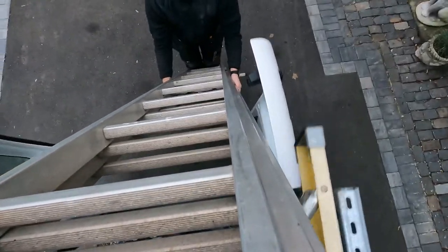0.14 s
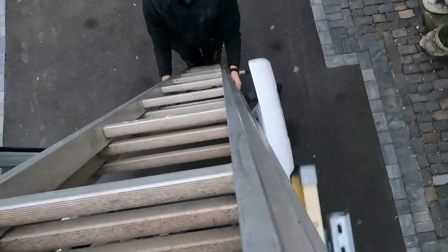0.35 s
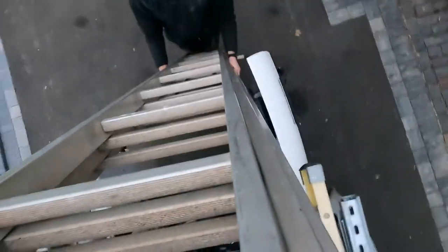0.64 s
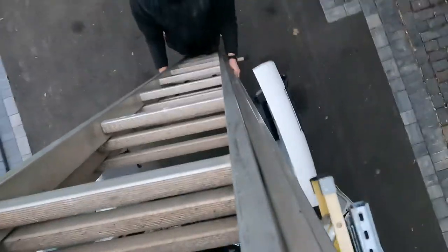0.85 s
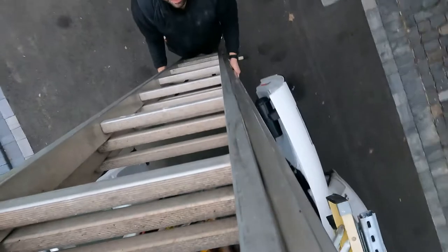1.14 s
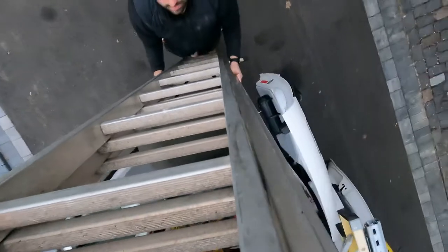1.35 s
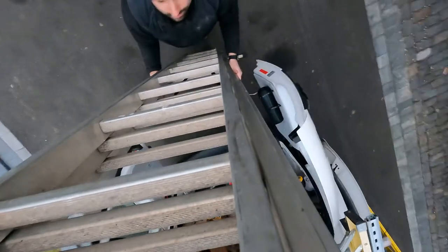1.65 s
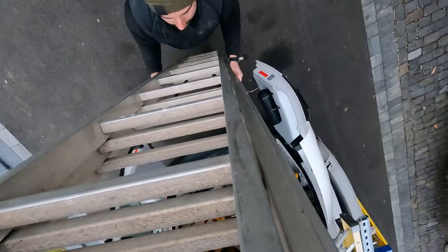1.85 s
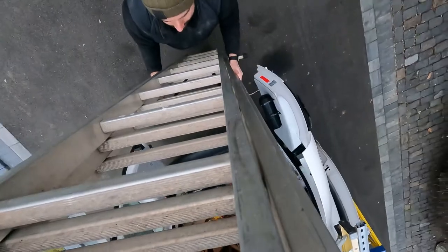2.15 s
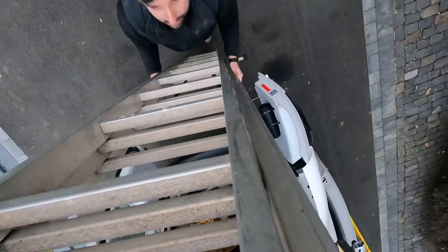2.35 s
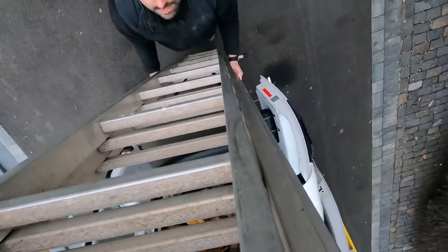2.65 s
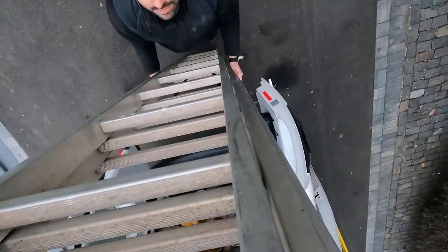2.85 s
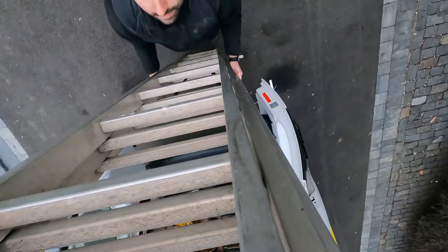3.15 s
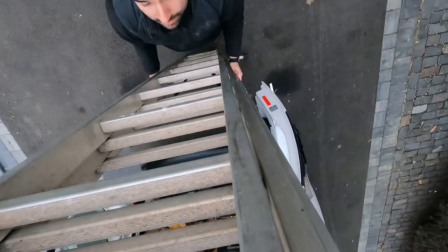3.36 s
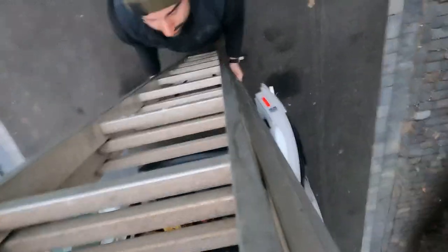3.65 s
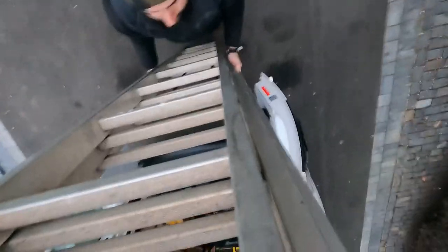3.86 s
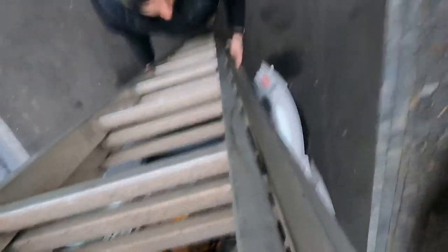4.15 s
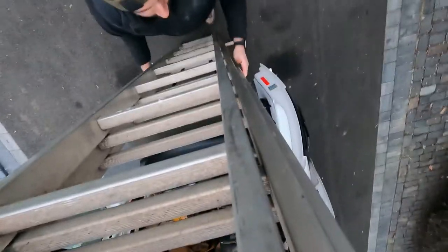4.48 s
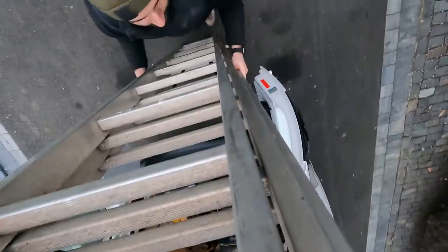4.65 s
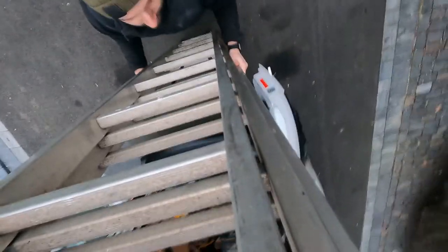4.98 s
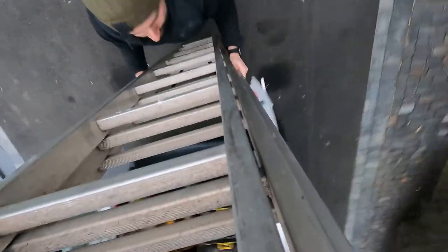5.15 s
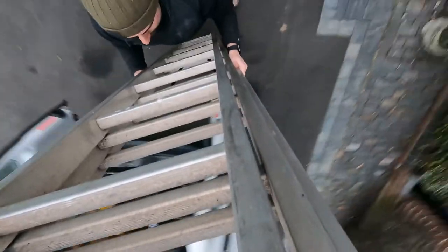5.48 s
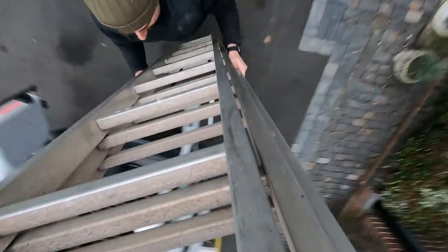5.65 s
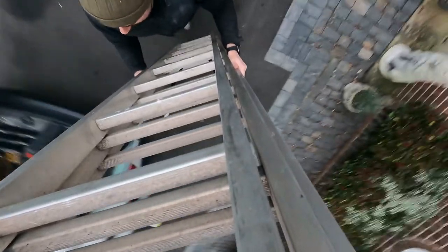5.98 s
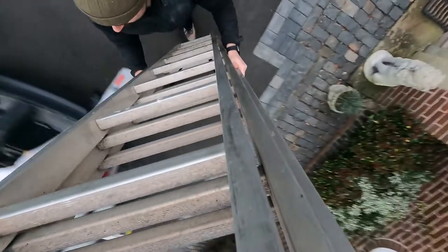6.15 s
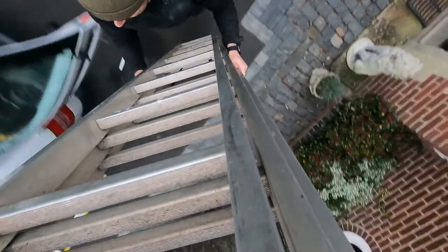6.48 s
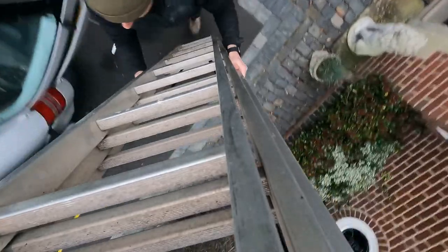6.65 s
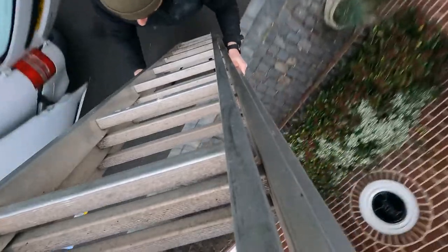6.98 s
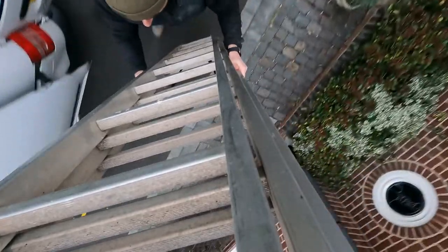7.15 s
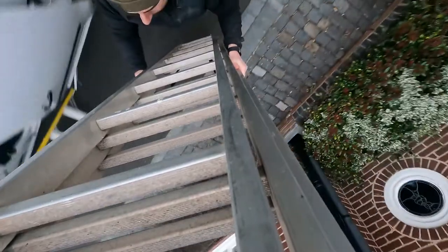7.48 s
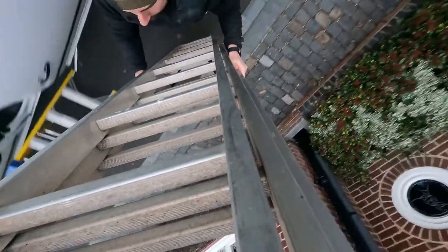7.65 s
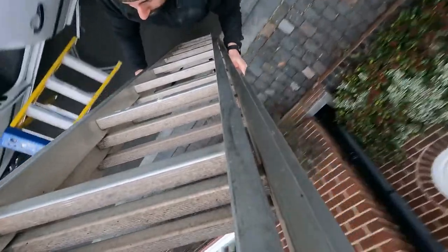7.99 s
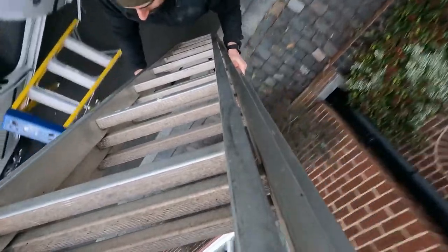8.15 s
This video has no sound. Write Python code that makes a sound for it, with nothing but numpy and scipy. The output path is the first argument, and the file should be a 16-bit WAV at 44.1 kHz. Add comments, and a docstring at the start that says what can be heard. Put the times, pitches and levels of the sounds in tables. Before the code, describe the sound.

Steady, muted traffic rumble lies behind an aluminium ladder being handled. One violent bang rings through its hollow rails, followed by small knocks and a brief faint bird whistle. After a lull, crowded blows and scraping shake the metal again, then soften to occasional taps and rubbing. Quick, gliding birdsong with slight outdoor echo closes the scene. Very close, nearly mono pickup with low mount thuds.

```python
"""An aluminium ladder is lifted and carried outdoors, heard by a small camera fixed to its top.
Over steady far street noise, soft rubbing leads to hard knocks after half a second, then it grows calmer.
A songbird whistles briefly near 1.7 s; from 3.6 to 5.1 s knocks and scrapes crowd together, then soften.
A thin far bird is heard from 5.7 s, and the songbird sings from 6.6 s almost to the end.
Blows and rubbing ring modes of the metal, jolts and bending are dying low swings, birds are gliding sines."""
import sys
import numpy as np
from scipy import signal
from scipy.fft import rfft, irfft
from scipy.io import wavfile
from scipy.ndimage import uniform_filter1d

SR = 44100
rng = np.random.default_rng(int(sys.argv[2]) if len(sys.argv) > 2 else 0)


def int16_out(signal):
    """Quantize to a 16-bit WAV file."""
    q = np.round(np.clip(np.atleast_2d(signal).T, -1, 1) * 32767)
    wavfile.write(sys.argv[1], SR, q.astype(np.int16))


def volts_from_db(level):
    """Convert decibel levels to linear amplitude ratios."""
    exponent = np.asarray(level, float) / 20
    return 10 ** exponent


N = 366912  # length in samples

# In all tables t60 is the time in seconds in which a sound dies away by 60 dB.
# Far traffic and air. Each row: frequency in Hz, level in dB per Hz.
STREET = [(15, -45), (25, -22), (70, 6), (173, -3.5), (271, -1), (569, -6), (846, -6), (940, -9.5),
          (1440, -10), (2140, -14.5), (3930, -30.5), (7030, -41.5), (9170, -68.5), (11900, -52),
          (14000, -74)]
# Rubbing, hand shifts and steps. Each row: middle in seconds, length in seconds, level in dB,
# brightness in dB (top against bass).
STROKES = [(.0, .2, -39, -42.5), (0.1, 0.65, -43, -16), (0.46, 0.76, -48.5, -17), (0.845, 0.11, -28, -31),
           (1.22, 0.25, -44.5, -20.5), (1.3, 0.36, -47, 0.5), (1.49, 0.32, -49, 0.5),
           (1.598, 0.15, -25, -52), (1.776, 0.24, -26, -44), (2.284, .3, -48, -29),
           (2.716, 0.31, -42, -33.5), (3.816, 0.18, -16, -31.5), (4.011, 0.16, -13, -25.5),
           (4.4, .4, -53.5, -10.5), (4.704, 0.77, -53, -14), (5.016, .2, -30, -27), (5.624, 0.76, -42, -46),
           (5.89, 0.66, -55.5, -14), (6.377, 0.5, -37, -38), (6.536, 0.9, -70, -2),
           (6.921, 0.23, -35, -37.5), (7.295, 0.64, -52.5, -16.5), (7.483, 0.33, -42.5, -27),
           (7.884, 0.96, -52, -15), (8.0, 0.78, -46.5, -32), (8.313, 0.5, -58.5, -8)]
# How far a stroke has faded at either end. One value in dB for each band, low to high.
STROKE_FADE_DB = [-14, -13, -13, -19.5]
# Balance of a stroke. One value in dB for each band, low to high.
STROKE_DB = [-0.44, -2.5, 1.5, -2.2]
# How much brightness lifts a stroke. One value in dB per dB for each band, low to high.
STROKE_PER_BRIGHT = [0.01, .35, .68, .99]
# Rattle left by a blow, against the blow. One value in dB for each band, low to high.
SHAKE_DB = [-13.5, -15, -16.5, -37.5]
# How long that rattle lasts. One t60 in seconds for each band, low to high.
SHAKE_T60 = [0.56, 0.26, 0.34, 0.82]
# Blows on the ladder. Each row: start in seconds, strength in dB, hardness in dB (treble against middle),
# t60 of the damping in seconds.
BLOWS = [(.083, -43.5, 5.5, 0.24), (0.123, -44.5, 10, 0.15), (0.461, -23, 15, .1), (.471, 2, -3, 0.1),
         (.494, -4.5, -5.5, 0.23), (0.524, -3, -5.5, 0.085), (.554, -8.5, -11.5, 0.45),
         (.619, -16.5, -28.5, 0.69), (0.705, -21, -11.5, 0.56), (0.827, -30.5, -8.5, 0.48),
         (0.897, -36, -5.5, 0.18), (.99, -77.5, 3.5, 0.3), (1.081, -40, 4, 0.51), (1.164, -48.5, 12, 0.53),
         (1.376, -34, -13.5, .25), (1.515, -30.5, -15, 0.32), (1.544, -28, -21, 0.17),
         (1.624, -19, -15.5, 0.43), (1.725, -20, -10.5, 0.24), (1.815, -17.5, -19.5, 0.37),
         (2.689, -40.5, -37.5, 0.74), (3.637, -13.5, -19, .66), (3.671, -3, -3, 0.087),
         (3.687, -14, -4.5, 0.5), (3.729, -22, -39, 0.19), (3.759, -14, -9, 0.44), (3.786, -17.5, -1, 0.44),
         (3.814, -12, -7, 0.15), (3.858, -14.5, -6.5, .12), (3.935, -16, -2.5, 0.22), (3.946, -8, 1.5, .41),
         (3.977, -16, 9, 0.32), (4.025, -20.5, 21.5, 0.073), (4.055, -22.5, 17.5, 0.17),
         (4.064, -20.5, 16, .2), (4.085, -10.5, -5.5, 0.22), (4.11, -2, -8.5, 0.061),
         (4.167, -12.5, 2.5, 0.18), (4.216, -15.5, -2.5, .27), (4.299, -19.5, -3, 0.35),
         (4.33, -17.5, -4, 0.083), (4.403, -21, -9, 0.071), (4.491, -39, -1, 0.34), (4.569, -19, -7, 0.067),
         (4.6, -28, 3, 0.2), (4.613, -21.5, -3, 0.22), (4.683, -25.5, -8, 0.063), (4.778, -28, -17, 0.45),
         (4.899, -25, -20, 0.32), (4.927, -31.5, -9, 0.25), (4.987, -25, -21.5, 0.077),
         (5.008, -15.5, -13, 0.18), (5.089, -5.5, -3, 0.41), (5.534, -25, -34, 0.047),
         (5.594, -18.5, -10.5, 0.086), (5.953, -26, -22, 0.19), (6.028, -28, -10.5, 0.16),
         (6.206, -26, -10.5, .25), (6.247, -28, -10.5, 0.41), (6.269, -26, -18, 0.24),
         (6.353, -28.5, -20.5, 0.2), (6.393, -32.5, -5, 0.2), (6.418, -29, -11.5, 0.32),
         (6.499, -60, 16.5, .15), (6.771, -42.5, -1, 0.38), (6.886, -29, -20, 0.12),
         (6.908, -28, -20, 0.29), (7.263, -62.5, 8, 0.13), (7.419, -38.5, -22, 0.28),
         (7.475, -41.5, -7, 0.092), (7.822, -51.5, 13, 0.55), (7.946, -29, -19, 0.46),
         (7.99, -32.5, -9, .19)]
# How bright the top treble of the blows is over time, with one very bright tick at 0.99 s.
# Each row: time in seconds, change of the highest band in dB.
BLOW_TREBLE = [(0, -21), (.5, 2), (.7, 0.5), (.95, -2), (.99, 45), (1.06, 2), (1.6, -5), (1.85, -7.5),
               (3.63, 6.5), (3.7, -15.5), (4.04, 1.5), (4.2, -14), (4.45, 1), (4.6, -14.5), (4.93, -17),
               (4.99, 3), (5.1, -6), (5.6, -4.5), (6.3, -5), (6.9, 4), (7.3, 5), (7.5, 4), (7.85, -10),
               (8, -5)]
# Centres of the four bands. One value in Hz for each band, low to high.
BANDS_HZ = [300, 1100, 3200, 7000]
# Clearest modes (natural tones) of rails and rungs. Each row: pitch in Hz, level in dB, t60 in seconds.
RUNGS = [(373, -7.5, 0.18), (518.3, 0, 0.19), (564.4, -2, 1), (661, 4.5, 0.2), (697.3, -0.5, 0.44),
         (784, -10, 1), (842, -5, 0.5), (985.5, -6, 0.24), (1076, -5, 0.52), (1112, -11, 0.59),
         (1240, -24.5, 0.31), (1517, -3, 0.4), (1600, -9.5, 0.3), (1761, -4.5, 0.41), (2010, -17.5, 0.16),
         (1950, -12, 0.22), (2226, -8, 0.44), (2450, -4, 0.21), (2717, -3, 0.3), (2834, -4, 0.2),
         (2973, -5, 0.12), (3300, -13, 0.28), (3560, -31, 0.083), (4040, -15, 0.42), (4300, -17, 0.3),
         (4506, -24.5, 0.35), (5120, -23, .15), (5020, -26, 0.54)]
# Dense weak modes of the thin walls. Each row: pitch in Hz, level in dB, typical t60 in seconds.
SHELL = [(54, -4.5, 0.088), (96, -1, 0.74), (350, 12, 0.43), (833, -2, 0.18), (1950, -4.5, 0.47),
         (4000, -11, 0.1), (7000, -17.5, 0.28), (8700, -31, 0.1), (8830, -33.5, 0.059), (9800, -34, 0.2),
         (11300, -26, 0.29), (14500, -60, .06)]
# Jolts of the camera mount. Each row: time in seconds, peak in dB, pitch in Hz, t60 in seconds.
THUMPS = [(0.187, -24.5, 266, 0.085), (0.272, -26.5, 280, 0.029), (.414, -28, 257, 0.044),
          (0.465, -4.5, 350, 0.039), (0.517, 3.5, 380, 0.036), (0.711, -18, 415, 0.1),
          (0.743, -20, 430, 0.084), (.832, -18, 429, 0.22), (1.192, -31, 388, 0.13),
          (1.498, -25.5, 393, 0.062), (1.584, -11, 318, 0.015), (1.625, -4.5, 370, 0.05),
          (1.721, -8.5, 350, .13), (1.77, -27, 366, .05), (1.814, -12.5, 365, 0.092),
          (2.688, -30, 384, 0.061), (3.635, -12, 243, 0.036), (3.668, -2.5, 336, .035),
          (3.69, -3, 333, 0.097), (3.759, -14, 304, 0.086), (3.853, -7.5, 365, .062),
          (3.956, -7.5, 344, 0.1), (3.979, -9.5, 350, .05), (4.003, -14, 350, 0.044),
          (4.028, -16, 352, .068), (4.072, -12, 350, .02), (4.092, -13, 318, 0.082),
          (4.166, -7.5, 337, 0.073), (4.308, -16, 356, 0.088), (4.341, -26, 338, 0.093),
          (4.4, -25.5, 327, .094), (4.656, -29.5, 331, 0.16), (4.811, -21, 340, 0.13),
          (4.898, -27, 330, 0.081), (4.988, -8, 373, 0.054), (5.007, -7, 350, 0.078),
          (5.094, -16, 342, 0.19), (5.458, -30, 334, 0.14), (5.592, -12, 356, 0.068),
          (5.95, -15, 357, 0.045), (6.028, -17.5, 356, 0.049), (6.204, -17.5, 350, 0.099),
          (6.255, -22.5, 334, 0.13), (6.349, -16, 342, 0.074), (6.415, -12.5, 362, 0.023),
          (6.886, -37.5, 350, 0.055), (6.906, -28.5, 271.5, 0.24), (7.419, -31.5, 342, 0.071),
          (7.945, -35, 223, .056), (8.057, -32, 275, .035)]
# Slow bending of the long rails. Each row: time in seconds, peak in dB, pitch in Hz.
SWAYS = [(.474, -12, 159), (0.489, -9, 237), (.55, -14, 217), (1.582, -37, 100), (1.83, -31, 139),
         (2.697, -41, 192), (3.633, -21, 154), (3.763, -22, 136), (3.943, -47, 170), (4.27, -34.5, 131),
         (4.608, -40, 180), (4.994, -57, 115.2), (5.864, -35, 162.6), (5.956, -28.5, 190),
         (6.204, -35.5, 170), (6.349, -39, 149), (6.416, -30.5, 150), (6.899, -50, 181), (7.419, -37, 191)]
# Songbird notes. Each row: start in seconds, length in seconds, first pitch in Hz, last pitch in Hz,
# level in dB.
NOTES = [(1.666, 0.042, 3510, 3150, -45), (1.681, 0.22, 3310, 3090, -52.5),
         (6.582, 0.028, 6370, 4800, -51.5), (6.611, 0.028, 4820, 4600, -39.5),
         (6.653, 0.12, 4410, 4700, -45.5), (6.723, 0.032, 4170, 3900, -29), (6.729, 0.041, 4675, 3350, -39),
         (6.751, 0.05, 5500, 5250, -45.5), (6.83, 0.025, 5100, 4300, -31.5),
         (6.912, 0.039, 5530, 3900, -33.5), (6.943, 0.028, 4000, 3900, -31.5),
         (7.012, 0.048, 5100, 4150, -33.5), (7.082, 0.18, 4530, 4320, -45.5),
         (7.323, 0.079, 4350, 4310, -55), (7.35, 0.079, 3793, 3200, -40.5), (7.403, .13, 3404, 3560, -35),
         (7.506, .12, 3480, 3750, -49), (7.572, 0.077, 2410, 2700, -44.5),
         (7.612, 0.096, 3300, 2950, -28.5), (7.651, 0.16, 3780, 3770, -57), (7.717, 0.069, 4580, 4600, -29),
         (7.834, 0.073, 2650, 2500, -37), (7.916, 0.089, 2400, 2600, -40), (7.993, 0.14, 2490, 2826, -51)]
# Thin far bird. Each row: time in seconds, pitch in Hz, level in dB.
WHISTLE = [(5.68, 8520, -82), (5.981, 7650, -83.5), (6.1, 7500, -72), (6.2, 7800, -72), (6.32, 7650, -87)]
# Left-right difference. Each row: frequency in Hz, side against mid in dB before a common lift.
WIDTH = [(60, -35.5), (180, -56.5), (550, -56), (1650, -61), (4970, -35), (15000, -6)]


def evened(x):
    """Scales a sound to rms 1."""
    return x / np.sqrt(np.mean(x ** 2) + 1e-20)


def read(points, hz, column=1):
    """Looks a table up on a log-frequency axis."""
    table = np.transpose(points)
    return np.interp(np.log(hz + 1), np.log(table[0] + 1), table[column])


def add(mix, s, sound):
    """Mixes a sound in at time s, in seconds."""
    part = mix[round(s * SR):][:len(sound)]
    part += sound[:len(part)]


def coloured(x, points):
    """Filters a sound by a spectrum table."""
    return irfft(rfft(x) * volts_from_db(read(points, np.fft.rfftfreq(N, 1 / SR))), N)


def modes(hz, db, t60, seconds):
    """Dying sines, and the share of each in the four bands, each band of power 1."""
    t = np.arange(round(seconds * SR), dtype=np.float32) / SR
    rings = np.sin(np.outer(2 * np.pi * hz, t).astype(np.float32))
    rings *= np.exp(np.outer(-np.log(1000) / t60, t).astype(np.float32))
    rings[:, :1500] *= 1 - np.exp(-t[:1500] * hz[:, None])  # bass builds up over a cycle or so
    nearness = [np.interp(np.log(hz), np.log(BANDS_HZ), row) for row in np.eye(4)]
    share = np.array(nearness) * volts_from_db(db)
    return rings, share / np.sqrt((share ** 2).sum(1, keepdims=True) / 2)


def shell(count=600):
    """The many weak modes of the thin walls, at random pitches."""
    hz = 50 + 13900 * rng.random(count) ** 1.6
    t60 = read(SHELL, hz, column=2) * rng.uniform(0.5, 1.26, count)
    return modes(hz, read(SHELL, hz), t60, .25)


def band_db():
    """Level of each blow in the four bands: the dull thud grows more slowly than the blow."""
    s, db, hard = np.transpose(BLOWS)[:3]
    treble_db = np.interp(s, *np.transpose(BLOW_TREBLE))
    thud = -8 + 0.58 * db + 0.06 * hard
    highest = db - 11 + hard + treble_db
    return np.c_[thud, db, db + hard, highest]


def agitation():
    """How hard loose parts rub and rattle in each band: the dying shake of blows plus the strokes."""
    lead_start_db, lead_t60 = -7, .04  # parts start to slide just before they knock
    t = np.arange(0, N / SR + .01, .002)
    power = 1e-14
    for s, db in zip(np.transpose(BLOWS)[0], band_db()):
        fall_db = -60 * np.maximum(t - s, 0) / np.array(SHAKE_T60)[:, None]
        lead_db = np.where(t > s, 0, lead_start_db - 60 * np.minimum(s - t, 1) / lead_t60)
        power = power + volts_from_db(2 * ((db + SHAKE_DB)[:, None] + fall_db + lead_db))
    for s, length, db, bright_db in STROKES:
        level_db = db + np.add(STROKE_DB, np.multiply(STROKE_PER_BRIGHT, bright_db))
        fade_db = np.c_[STROKE_FADE_DB] * abs(2 * (t - s) / length)
        power = power + volts_from_db(2 * (level_db[:, None] + fade_db))
    return [np.interp(np.arange(N) / SR, t, row) for row in np.sqrt(power)]


def swings(rows):
    """A few low cycles with a soft start, for each row of time, peak dB, pitch and t60."""
    out, t = np.zeros(N), np.arange(SR // 3) / SR
    for s, db, hz, t60 in rows:
        swing = (1 - np.exp(-t * hz / 0.39)) ** 2 * volts_from_db(-60 * t / t60)
        wave = np.sin(2 * np.pi * hz * t)
        add(out, s - 0.48 / hz, volts_from_db(db) * swing / swing.max() * wave)  # begins about half a cycle early
    return out


def street():
    """Steady far noise: random spectra shaped by a table, with drifting patches."""
    frames, hz = N // 256 + 5, np.fft.rfftfreq(1024, 1 / SR)
    a, b, patches = rng.standard_normal((frames, 513, 3)).T
    patches = evened(uniform_filter1d(uniform_filter1d(patches, 10, 0), 16, 1))
    spectra = (a + 1j * b) * volts_from_db(read(STREET, hz)[:, None] + 0.41 * patches)
    noise = signal.istft(spectra, nperseg=1024, noverlap=768)[1][:N]
    return volts_from_db(-48) * evened(noise)


def rubbing(dense, share, slips_per_s=900, spread_db=-1.5, t60=0.02):
    """Small uneven slips and rattles ring the damped walls while the contact spot wanders."""
    slips = (rng.random(N) < slips_per_s / SR) * volts_from_db(spread_db * np.minimum(rng.exponential(1, N), 4))
    slips = evened(slips * rng.choice([-1, 1], N)) + 0.72 * rng.standard_normal(N)
    clear, clear_share = modes(*np.transpose(RUNGS), .125)
    clear_db = np.c_[[-18, -11, -14, -21]]  # low band to high: treble rubs more as hiss
    share = np.c_[share, volts_from_db(clear_db) * clear_share]
    fade_db = -60 * np.arange(clear.shape[1]) / SR / t60
    damped = np.r_[dense[:, :len(fade_db)] * volts_from_db(fade_db), clear * volts_from_db(.35 * fade_db)]
    spot = rng.integers(0, 3, N // 900 + 1).repeat(900)[:N]  # one of three spots, drawn every 900 samples
    out = np.zeros(N)
    for level, band in zip(agitation(), share):
        drive = (slips * level).astype(np.float32)
        spot_rings = band * rng.standard_normal((3, len(band))) @ damped
        for k, ring in enumerate(spot_rings):
            ring = (ring / np.linalg.norm(ring)).astype(np.float32)
            out += signal.oaconvolve(drive * (spot == k), ring)[:N]
    return out


def blows(dense, share):
    """Each blow lands somewhere else and chatters briefly; the clear modes outlast the dense crash."""
    crash_t60 = 0.69  # s: a limit on how long the thin walls ring
    blunt_s, settle_s = 0.0026, .045  # extra rise time on a ladder that still shakes; time to settle
    rows, out, t = np.array(BLOWS), np.zeros(N), np.arange(SR // 2) / SR
    hard, damp_t60 = rows[:, 2:3], rows[:, 3:4]
    clear, clear_share = modes(*np.transpose(RUNGS), .5)
    draws = rng.standard_normal((len(rows), len(clear) + len(dense) + 3000))
    spot, place, chance, sizes = np.split(draws, [len(clear), -3000, -1500], 1)
    levels = volts_from_db(band_db() - 6.5)

    # the lowest band is the dull thud of the crash; the clear modes follow the three above it
    clear_levels = levels[:, [1, 1, 2, 3]] * volts_from_db([-0.6, 0.45, 1.6, 0])
    uneven_db = (4 * abs(spot) - 3) * np.clip(2.2 - 5 * damp_t60, .2, 1)  # a grip mutes some modes
    clear_db = -7 + 0.045 * hard + 16 * (damp_t60 - .25)  # hard or undamped blows ring clearer
    tones = (clear_levels @ clear_share * np.sign(spot) * volts_from_db(uneven_db + clear_db)) @ clear
    crashes = (levels @ share * place).astype(np.float32) @ dense

    chatter = (chance > 2.3) * sizes * volts_from_db(-14.0 - 60 * t[:1500] / 0.12)  # loose parts bounce after the blow
    chatter[:, 0] = 1  # the blow itself
    short = t[:dense.shape[1]]
    crack = 1 + 0.65 * np.exp(-short / 0.0012)  # the contact itself is short and loud
    walls = volts_from_db(-60 * short / crash_t60)
    gaps = abs(np.diff(rows[:, 0], prepend=-1))
    rises = .0001 + blunt_s * np.exp(-gaps / settle_s)
    for row, sound, crash, bounces, rise in zip(rows, tones, crashes, chatter, rises):
        damp_db = -60 * t / row[3]  # hands and contact damp the ring
        sound *= volts_from_db(0.25 * damp_db)  # the clear modes are damped less
        crash = crash * (1 - np.exp(-short / rise)) * crack * walls * volts_from_db(damp_db[:len(short)])
        add(sound, 0, signal.fftconvolve(crash, bounces))
        add(out, row[0] - .001, sound)
    return out


def thumps():
    """Each jolt makes the camera mount swing for a few cycles at its own pitch."""
    return swings(THUMPS)


def bends():
    """Every jolt of the mount also flexes the whole ladder, at a lower pitch."""
    return swings([(s, db - 23.5, 108 * rng.uniform(.85, 1.0), .2) for s, db, *_ in THUMPS])


def sways():
    """The long rails bend slowly, dying away with a t60 of 0.19 s."""
    return swings([(*row, 0.19) for row in SWAYS])


def songbird():
    """Gliding, unevenly warbling sines, blurred by leaves and the echoes of house walls."""
    song, t = np.zeros(N), np.arange(SR) / SR
    waver = evened(uniform_filter1d(uniform_filter1d(rng.standard_normal(N), 90), 90))
    for s, length, first_hz, last_hz, db in NOTES:
        warble_hz = 0.076 * first_hz * volts_from_db(0.77 * (db + 22))  # softer notes warble less
        u = np.linspace(0, 1, round(length * SR))
        loose = waver[round(s * SR):][:len(u)]
        warble = 0.5 * np.sin(2 * np.pi * 85 * length * u) + .5 * loose  # half regular at 85 Hz, half random
        hz = last_hz + (first_hz - last_hz) * (1 - u) ** 1.9 + warble_hz * warble
        loudness = volts_from_db(db + 4.14 * loose[::-1]) * abs(np.sin(np.pi * u)) ** 0.77
        add(song, s, loudness * np.sin(2 * np.pi * np.cumsum(hz) / SR))
    taps = rng.standard_normal(SR) * (rng.random(SR) < .05)
    slaps = sum(volts_from_db(db - 60 * abs(t - s) / 0.25) for s, db in [(.01, 9), (.11, -9), (.25, -8)])
    echoes = taps * (volts_from_db(10.5 - 60 * t / 0.54) + slaps) * (t > .003)
    return song + volts_from_db(-0.95) * signal.oaconvolve(song, echoes / np.linalg.norm(echoes))[:N]


def far_bird():
    """One thin sine whose pitch and level slide from point to point."""
    out = np.zeros(N)
    s, hz, db = np.transpose(WHISTLE)
    t = np.arange(s[0], s[-1], 1 / SR)
    thin = volts_from_db(np.interp(t, s, db)) * np.sin(2 * np.pi * np.cumsum(np.interp(t, s, hz)) / SR)
    add(out, s[0], thin * signal.windows.tukey(len(thin), .1))
    return out


def scene():
    """Everything reaches one microphone spot; only a trace differs left to right."""
    rings, share = shell()
    ladder = rubbing(rings, share) + blows(rings, share) + thumps() + bends() + sways()
    mid = street() + ladder + songbird() + far_bird()
    side = volts_from_db(5) * coloured(np.roll(mid, 300), WIDTH)  # shifted by 300 samples
    return np.array([mid + side, mid - side])


def low_pass(x):
    """Removes everything above the highest recorded frequency."""
    return signal.sosfilt(signal.butter(12, 16300, fs=SR, output="sos"), x)


def record(dry):
    """Gain control turns down a few dB after loud moments and slowly recovers; peaks are rounded."""
    power_db = 10 * np.log10(abs(uniform_filter1d((dry ** 2).mean(0), 2000)) + 1e-12)
    fall = np.arange(N) * 12.1 / SR  # the remembered loudness falls by 12.1 dB per s
    held_db = np.maximum.accumulate(power_db + fall) - fall
    over_db = np.maximum(held_db + 37.5, 0)  # excess over -37.5 dB
    bass_cut = signal.butter(4, 50, "high", fs=SR, output="sos")  # cuts the deep bass below 50 Hz
    heard = signal.sosfilt(bass_cut, dry)
    ducked = heard / volts_from_db(0.15 * uniform_filter1d(over_db, 2001, origin=1000))  # averages the past 2001 samples
    finished = 1.092 * np.tanh(ducked / 1.032)
    return low_pass(finished)


dry = scene()
out = record(dry)
int16_out(out)
```